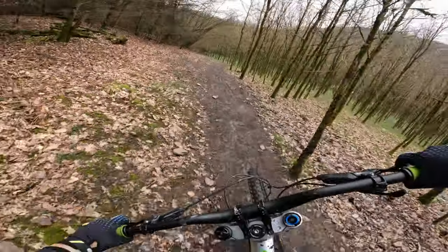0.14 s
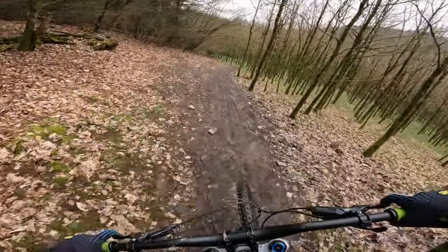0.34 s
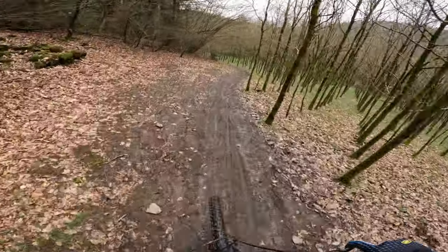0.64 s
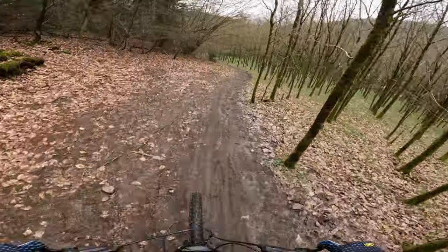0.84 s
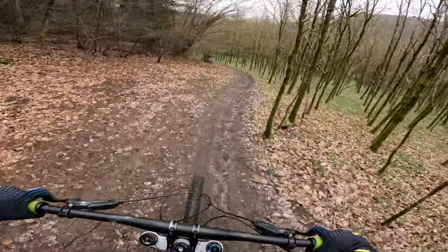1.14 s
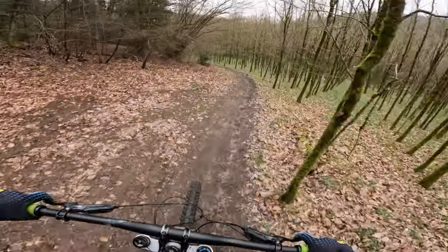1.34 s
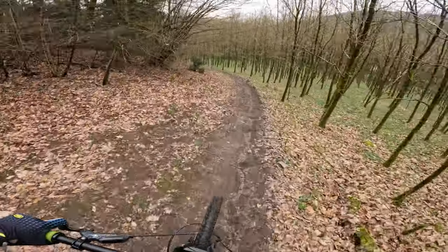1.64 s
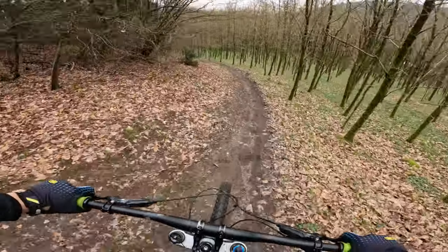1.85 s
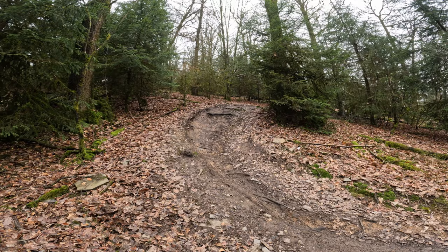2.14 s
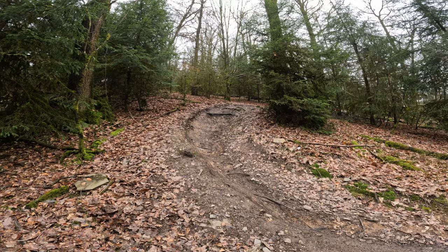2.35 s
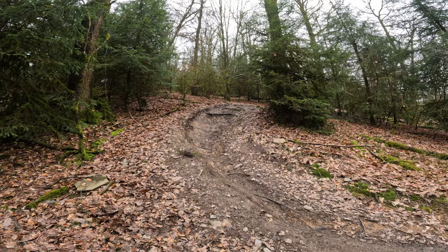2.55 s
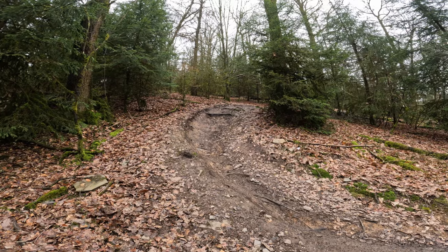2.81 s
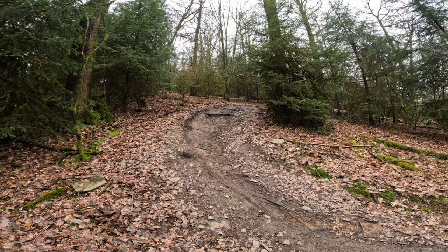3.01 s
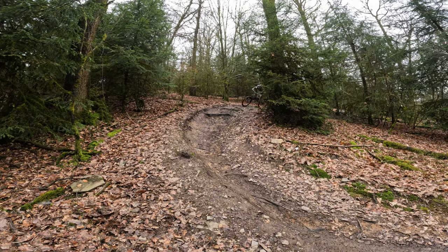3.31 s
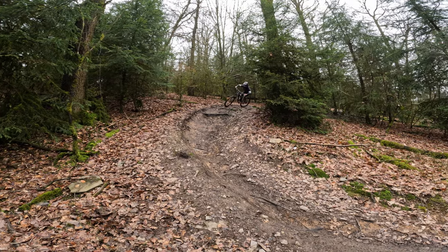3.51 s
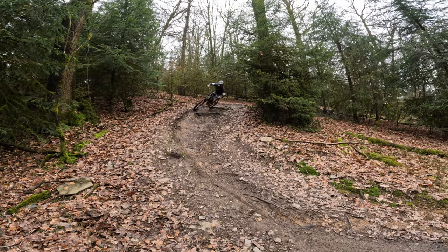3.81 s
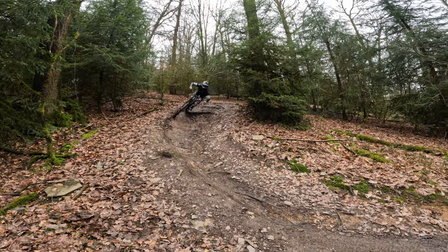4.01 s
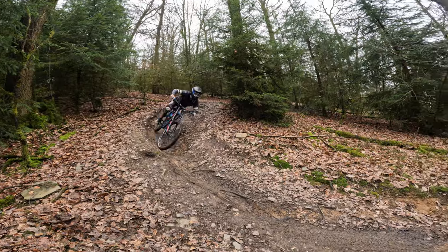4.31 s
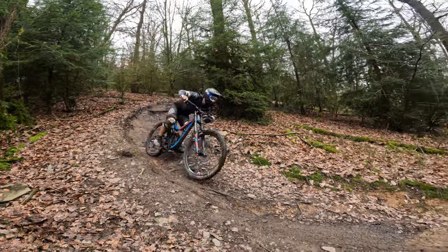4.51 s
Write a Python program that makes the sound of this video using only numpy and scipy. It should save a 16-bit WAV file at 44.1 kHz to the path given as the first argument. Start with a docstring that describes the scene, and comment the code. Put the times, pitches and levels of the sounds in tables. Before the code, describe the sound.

A mountain bike on damp leaves and mud: first a close on-board microphone, the same in both channels, with bassy wind, rattling jolts, grit ticks and muted tyre hiss. Then an abrupt switch to a still trailside microphone with wide, quiet air. The bike nears through a bend, its sparse clicks becoming dense crunching, spray, clatter and thuds close by.

```python
"""A bike runs down a wet forest trail, heard first from on board: shaped noise makes the wind, frame rumble
and tyre fizz; short noise bursts and ringing modes make the squelches, jolts and ticks of grit.
The sound then cuts to a still spot beside the trail: quiet woods of steady noise, and the bike coming near
with grainy tyre crunch and spray, resonant clacks, cracking stones and twigs, and thuds in the ground."""
import sys
import numpy as np
from scipy import signal
from scipy.fft import rfft, irfft, next_fast_len
from scipy.io import wavfile
from scipy.ndimage import uniform_filter1d

SR = 44100
rng = np.random.default_rng(int(sys.argv[2]) if len(sys.argv) > 2 else 0)


def log_audio(samples):
    """Write samples as a 16-bit WAV file to the path given in sys.argv[1]."""
    # one column per channel
    frames = np.atleast_2d(samples).T
    # limit to full scale, then quantise
    limited = np.clip(frames, -1, 1)
    pcm = np.round(limited * 32767).astype(np.int16)
    wavfile.write(sys.argv[1], SR, pcm)


N = 205550  # samples

CUT_S = 2.181  # from on board to beside the trail

# Spectrum tables give the shape of a noise: pitch_hz, relative_db
# Wind and frame on board: start_s, wind_db, frame_rumble_db
WIND_AND_RUMBLE_LEVELS = [(0.0, -21.5, -25), (0.15, -25, -31), (0.2, -18.5, -26.5), (0.245, -21, -28),
                          (0.28, -24, -29.5), (0.32, -25, -31), (0.75, -28, -31.5), (0.8, -20, -27.5),
                          (0.83, -27.5, -32.5), (1.4, -29.5, -35.5), (2.01, -24, -33), (2.17, -27, -30)]
# Wind on the microphone: pitch_hz, relative_db
WIND_SPECTRUM = [(4.7, -27), (8.0, 9), (28, 6), (108, -11.5), (200, -5.5), (260, -100), (440, -120)]
# Low shaking of the frame: pitch_hz, relative_db
RUMBLE_SPECTRUM = [(41, -13), (70, 1), (107, -14), (210, -5.5), (258, -3.5), (587, -13.5), (775, -22.5),
                   (900, -17.5), (1170, -22), (1980, -120)]
# Wet tyres on board: start_s, fizz_db, fine_spray_db
TYRE_LEVELS = [(0.0, -34, -53), (0.01, -35, -32.5), (0.08, -39, -30.5), (0.13, -39.5, -32),
               (0.18, -38, -43), (0.21, -40, -35), (0.29, -34.5, -40), (0.33, -45.5, -48), (0.4, -38, -33),
               (0.47, -43, -49.5), (0.75, -38, -41.5), (0.87, -37.5, -44.5), (0.9, -42.5, -49),
               (0.958, -48.5, -49.5), (0.975, -38, -40), (1.02, -44, -41), (1.13, -40, -46.5),
               (1.16, -36.5, -41.5), (1.49, -46.5, -46.5), (1.63, -40.5, -40.5), (1.73, -46.5, -47),
               (1.9, -41, -46), (1.91, -38, -43), (1.95, -41, -45), (2.06, -27.5, -37), (2.07, -39, -49),
               (2.1, -31.5, -42.5), (2.17, -38, -45)]
# Tyre roll on board: start_s, level_db
ROLL_LEVELS = [(0.0, -49), (0.1, -38.5), (0.3, -56), (0.45, -43), (0.68, -39), (1.26, -41), (1.37, -48.5),
               (1.58, -44.5), (1.89, -42.5), (1.99, -53), (2.02, -38), (2.14, -37), (2.17, -38.5)]
# Low tone of the rolling tyre: pitch_hz, relative_db
ROLL_SPECTRUM = [(240, 31.5), (400, 15), (759, 19), (1420, 17.5), (1580, -13), (1710, 5.5), (3000, -46),
                 (3900, -39), (6600, -120)]
# Wet fizz of the tread: pitch_hz, relative_db
FIZZ_SPECTRUM = [(820, -27), (1400, 1.5), (1880, -3.5), (2140, 0.5), (2420, -4.5), (3040, -3), (5380, -18),
                 (7000, -30), (9100, -27), (15400, -120)]
# Fine spray on board: pitch_hz, relative_db
MIST_SPECTRUM = [(2350, -4.5), (4000, -3.5), (6640, -10), (10100, -23), (12300, -31.5), (14200, -42),
                 (15600, -54)]
# Puffs of spray as the tyre cuts through wet patches: start_s, spray_rise_db (a negative one dips)
SPRAY_PUFFS = [(0.435, 6), (0.52, 8), (0.594, 9), (0.68, 6), (0.755, 2), (0.826, 2.5), (1.035, 1),
               (1.24, 2), (1.35, 4), (1.65, -0.5)]
# Squelches of mud: start_s, level_db, pitch_hz, length_s
SQUELCHES = [(0.006, -25.5, 2950, 0.016), (0.027, -27.5, 2700, 0.018), (0.047, -30, 3000, .02),
             (0.092, -29.5, 1720, .03), (0.068, -34, 4230, 0.027), (0.116, -35, 1720, 0.045),
             (0.214, -33, 2600, 0.018), (0.271, -36, 2760, .02), (0.968, -44, 4500, .012),
             (0.98, -36.5, 4430, .025), (1.032, -33, 5100, 0.013), (0.869, -34.5, 1390, .035),
             (1.15, -35.5, 1500, 0.052), (1.356, -39, 4500, 0.0078), (1.407, -41.5, 4000, .015)]
# Rattling modes of the frame: pitch_hz, width_hz, level_db
FRAME_MODES = [(695, 63, 2), (840, 27, 3), (915, 50, 4.5), (1050, 230, 4), (1280, 47, 5), (1984, 110, -3.5),
               (2190, 100, -2.5), (2445, 170, -3.5), (2700, 170, -3.5), (2880, 120, -11),
               (3240, 400, -13.5)]
# Jolts through the frame: start_s, rattle_peak_db, tone_hz, tone_against_rattle_db,
# brightness_db_per_octave, hold_s, t60_s, first_blow_against_shaking_db
JOLTS = [(0.085, -20.5, 218, -14, 14, 0.016, 0.26, 18), (0.18, -24.5, 200, 1, 0, 0.0044, 0.032, 14),
         (0.22, -17.5, 300, 4.5, -3, 0.0047, 0.023, 23), (0.253, -18, 450, -4, -4, .002, 0.03, 32),
         (0.355, -24.5, 300, 1, -2, .002, 0.076, 19.5), (0.473, -24, 224, 5.5, 19, .002, 0.032, 5),
         (0.661, -40, 220, -11, -7, 0.0036, 0.028, 24), (0.724, -36, 220, -15, 12, .001, .02, 26),
         (0.736, -7, 192, 3, 3, 0.0032, 0.012, 24), (0.748, -20, 202, 7, 3, .002, 0.027, 16),
         (0.761, -16.5, 266, -5, -3.5, 0.012, 0.067, 12), (0.786, -20, 218, -14, 1, 0.0076, 0.07, 18.5),
         (0.815, -27, 222, -2, -5, .008, 0.05, 20), (0.853, -21, 175, 6.5, -4, 0.0057, 0.041, 24),
         (1.783, -22, 210, 4, -4, 0.0042, 0.02, 12), (1.847, -14.5, 208, 1.5, 4, 0.003, 0.012, 16.5),
         (1.904, -12.5, 910, -5, 5.5, 0.0029, 0.022, 19.5), (2.023, -15, 218, -19, 2, 0.0067, 0.036, 12),
         (2.031, -8.5, 846, -2.5, -4.5, 0.0034, 0.048, 19.5), (2.036, -11.5, 219, 2, 2, 0.017, 0.03, 8),
         (2.054, -10, 220, -12, 7, 0.0026, 0.012, 24), (2.094, -19.5, 220, -25, 1.5, 0.0088, 0.081, 8),
         (2.106, -15.5, 840, -4.5, -1.5, 0.0038, 0.083, 19.5), (2.124, -18, 220, -18, -7, 0.0049, 0.05, 25),
         (2.158, -18, 219, -14, 3, .004, 0.12, 24)]
# Grit flicked against the frame: start_s, peak_db, pitch_hz
GRIT_TICKS = [(0.1909, -29, 3070), (0.367, -26, 4300), (0.378, -22, 3360), (0.515, -24, 3050),
              (0.6808, -27, 3350), (0.8214, -24, 3400), (1.0695, -26, 3200), (1.3542, -38, 3650),
              (1.411, -36, 3260), (2.001, -24, 3300)]

# Still air among the trees: pitch_hz, relative_db
WOODS_SPECTRUM = [(180, -28), (300, -1.5), (520, -23), (800, -31), (1000, -13), (4080, -35), (4440, -39),
                  (4660, -8), (7650, -21), (15600, -50)]
# Tyres beside the trail: start_s, crunch_db, spray_db, ground_rumble_db
PASS_LEVELS = [(2.19, -53, -83, -49), (2.37, -52, -64, -41), (2.472, -55.5, -57, -43.5),
               (2.482, -49.5, -70, -34.5), (2.515, -45, -47, -40), (2.53, -47.5, -47, -38.5),
               (2.6, -48, -47.5, -39.5), (2.664, -45, -44.5, -28.5), (2.74, -50.5, -47, -42),
               (2.804, -52.5, -51.5, -41.5), (2.9, -56.5, -57.5, -45.5), (3.006, -58, -53, -44.5),
               (3.12, -60, -58.5, -48), (3.2, -55.5, -61, -47), (3.35, -55, -60, -40.5),
               (3.472, -49.5, -55, -42), (3.77, -46, -54.5, -41.5), (3.87, -51, -52.5, -35),
               (3.974, -45, -48.5, -37), (4.02, -49, -57, -33.5), (4.08, -40.5, -48, -30),
               (4.17, -35.5, -42, -41), (4.205, -44.5, -48.5, -36), (4.24, -33.5, -38.5, -25),
               (4.305, -45.5, -51, -35), (4.35, -39, -41.5, -36), (4.43, -33, -47, -33),
               (4.47, -35, -41, -33), (4.6, -34, -35.5, -36), (4.625, -36.5, -44, -40),
               (4.66, -30, -39.5, -35)]
# Rumble through the ground: pitch_hz, relative_db
GROUND_SPECTRUM = [(7.1, -28), (12, -20), (43, 6), (65, 1.5), (118, -7), (211, -13.5), (266, -23.5),
                   (300, -22), (390, -85), (660, -120)]
# Lower body of the tyre noise: pitch_hz, relative_db
BODY_SPECTRUM = [(76, -35), (130, 2.5), (300, -7), (460, -7.5), (859, -12.5), (1200, -52), (1560, -32),
                 (2640, -120)]
# Tyre crunch: pitch_hz, relative_db
CRUNCH_SPECTRUM = [(410, -74), (700, 5.5), (809, -43), (899, 11), (1270, 10.5), (1830, 8.5), (4950, -0.5),
                   (7000, -33), (9100, -23), (15400, -120)]
# Spray beside the trail: pitch_hz, relative_db
SPRAY_SPECTRUM = [(2060, -8), (3500, -1.5), (4940, -4), (5660, -8.5), (7360, -7), (8450, -16),
                  (9870, -14.5), (15600, -37)]
# Clacks of chain and stones: start_s, level_db, centre_hz, treble_against_clack_db, thud_db, t60_s
CLACKS = [(2.265, -35, 1280, -27, -55, 0.023), (2.29, -31, 1480, -24, -52, 0.037),
          (2.343, -64, 3430, -15, -30.5, 0.022), (2.478, -30.5, 1610, -23, -48, .04),
          (3.02, -36, 2130, -30, -57, .03), (3.345, -54, 1770, -21, -48, 0.033),
          (3.366, -35, 1880, -21, -55, 0.028), (3.405, -31.5, 1180, -12, -54, 0.032),
          (3.458, -29, 2120, -21, -45, 0.094), (3.474, -32, 2880, -31, -40, 0.12),
          (3.553, -32, 1800, -15, -52, 0.075), (3.587, -24.5, 1410, -8, -38, 0.097),
          (3.599, -22, 1370, -25, -59, 0.054), (3.6345, -22.5, 1220, -20, -73, 0.032),
          (3.679, -27, 2780, -29, -38, 0.035), (3.688, -26, 1090, -28, -42, 0.021),
          (3.707, -29.5, 2500, -24, -47, 0.029), (3.742, -26, 1600, -35, -36, 0.0084),
          (3.749, -27, 1440, -10, -34, 0.019), (3.7875, -25, 2720, -11, -31, 0.013),
          (3.797, -24.5, 2720, -20, -35, 0.041), (3.813, -30, 1010, -9, -32.5, 0.064),
          (3.851, -38, 2850, -14, -38, 0.02), (3.883, -12.5, 2470, -37, -31, 0.031),
          (3.8855, -26, 2800, -23, -50, 0.033), (3.892, -14.5, 1790, -19, -17.5, 0.057),
          (3.915, -18, 1100, -18, -27, 0.061), (3.934, -22, 2100, -17, -52, 0.093),
          (3.942, -33, 2200, -18, -48, 0.023), (3.947, -29, 4500, -18, -40, 0.022),
          (3.951, -22, 2020, -24, -52, 0.0057), (3.957, -11.5, 1970, -20, -68, 0.029),
          (3.966, -22.5, 1940, -12, -22, 0.088), (3.973, -27, 2800, -20, -27, .02),
          (4.025, -25, 4300, -26, -38, 0.059), (4.033, -21, 2000, -28, -25, 0.01),
          (4.039, -24, 4500, -15, -39, 0.011), (4.062, -13, 3000, -38, -19, 0.057),
          (4.07, -33, 2950, 9, -56, 0.093), (4.1, -20, 1070, -5, -36, 0.15),
          (4.135, -21, 2510, -20, -37, 0.044), (4.17, -24.5, 1850, 0, -41, 0.037),
          (4.216, -18, 1760, -11, -18.5, 0.038), (4.241, -16, 1630, -3.5, -29, 0.072),
          (4.3125, -26, 3000, -18, -44, .015), (4.315, -13, 1430, -22, -28, 0.057),
          (4.336, -10.5, 1750, -16, -15, 0.048), (4.374, -22, 3000, -16, -37, 0.046),
          (4.381, -32, 2500, -7, -42, .03), (4.4, -27, 2400, -20, -50, 0.043),
          (4.413, -30, 2200, -20, -41, .03), (4.442, -20, 2600, -18, -31, 0.025),
          (4.455, -16.5, 2000, -16, -34, 0.05), (4.463, -22, 5000, -4, -35, 0.023),
          (4.474, -13.5, 1600, -14, -30, 0.034), (4.491, -23.5, 3000, 2.5, -47, 0.026),
          (4.514, -26, 2490, -10, -24, 0.032), (4.526, -14.5, 3300, -23, -25, 0.065),
          (4.534, -20, 3100, -16, -36, 0.026), (4.548, -31, 2500, -13, -28, 0.034),
          (4.559, -17, 1700, -17, -25, 0.028), (4.566, -17, 3300, -12, -33, 0.024),
          (4.575, -15, 2160, -10, -15.5, 0.046), (4.587, -19, 1760, -17, -21, 0.0099),
          (4.595, -18, 1810, -13, -52, 0.016), (4.599, -19, 2600, -12, -28, 0.012),
          (4.604, -16, 1280, -30, -35, 0.01), (4.632, -22, 1500, -25, -40, 0.051),
          (4.64, -11, 3470, -3.5, -12, 0.038), (4.6445, -3.5, 1580, -15, -17.5, 0.018)]
# Thud modes of the soil: pitch_hz, width_hz, level_db
THUD_MODES = [(70.5, 64, 6), (143.5, 54, -4), (300, 120, -4)]
# Stones and twigs cracking under the tyre: start_s, peak_db, pitch_hz
CRACKS = [(3.3457, -38, 2620), (3.3686, -35, 2390), (3.3982, -34, 1760), (3.4594, -28, 2270),
          (3.4676, -30, 2280), (3.4742, -31, 2330), (3.5078, -34, 2370), (3.5126, -33, 2170),
          (3.525, -32, 2500), (3.5403, -36, 2940), (3.5539, -30, 2300), (3.5864, -28, 3030),
          (3.5933, -26, 2450), (3.6348, -27, 1400), (3.6635, -33, 2320), (3.6802, -27, 2320),
          (3.6901, -24, 2600), (3.7045, -31, 2100), (3.7113, -33, 3080), (3.7288, -34, 2630),
          (3.7418, -21, 3240), (3.7511, -25, 3210), (3.7781, -32, 2850), (3.7871, -22, 3080),
          (3.7938, -28, 2740), (3.8133, -29, 2680), (3.8502, -30, 3090), (3.8825, -14, 2700),
          (3.8852, -15, 2690), (3.8922, -18, 2250), (3.9158, -21, 1440), (3.9355, -26, 2430),
          (3.9467, -25, 3180), (3.9511, -14, 2170), (3.9573, -12, 2420), (3.9641, -19, 2550),
          (4.0243, -22, 2860), (4.0333, -12, 2580), (4.0358, -20, 2740), (4.0389, -19, 2920),
          (4.0625, -10, 3170), (4.0729, -16, 2770), (4.1038, -25, 2720), (4.1354, -19, 2850),
          (4.157, -24, 2970), (4.1708, -21, 3500), (4.2173, -18, 2590), (4.243, -20, 1800),
          (4.2458, -18, 2810), (4.3154, -15, 1690), (4.3364, -13, 2930), (4.3419, -15, 1720),
          (4.3735, -14, 3030), (4.3786, -20, 2570), (4.3826, -18, 2520), (4.3998, -16, 2580),
          (4.4094, -20, 2270), (4.4131, -20, 2010), (4.4223, -20, 2280), (4.4321, -24, 2560),
          (4.4419, -14, 2750), (4.4448, -17, 1810), (4.4557, -15, 2030), (4.4731, -16, 1860),
          (4.4898, -21, 2470), (4.493, -19, 3710), (4.4964, -21, 3100), (4.515, -13, 2350),
          (4.5303, -15, 3430), (4.5328, -11, 2830), (4.5378, -17, 3110), (4.5599, -13, 2270),
          (4.5657, -13, 2440), (4.5723, -16, 2710), (4.5772, -13, 3030), (4.5864, -10, 2230),
          (4.5957, -13, 2000), (4.5993, -10, 2530), (4.6041, -12, 2690), (4.6151, -23, 2640),
          (4.6399, -7, 2360), (4.6453, -7, 1620)]
# Stereo width of the noises beside the trail, before narrowing: pitch_hz, side_against_middle_db
STEREO_WIDTH = [(60, -15), (110, -28), (200, -16), (380, -11), (700, -8), (1290, -5), (2380, -3),
                (4400, -4), (15000, -32)]
# Fluttering treble spread between the ports: pitch_hz, side_against_middle_db
TREBLE_SPREAD = [(1000, -50), (3000, -37), (9000, -9), (12500, -3), (15000, -6)]
# Tonal balance between the ports: pitch_hz, left_against_right_db
PORT_BALANCE = [(600, 0), (3000, -1.4), (8000, -0.2), (14000, 7.5)]

USUAL_FIZZ_DB, RUMBLE_FOLLOWS = -40, 0.47  # rumble swells with the fizz, dB per dB
PUFF_RISE_S, PUFF_FIZZ = 0.012, 0.45  # time to the top; share of the rise that the fizz takes
SQUELCH_WIDTH = 0.32  # share of the pitch
JOLT_RISE_S = 0.0032
TICK_WIDTH, TICK_T60_S = 0.13, 0.014  # width as a share of the pitch

WOODS_DB = -61.5
CRUNCH_FAR_DB, CRUNCH_NEAR_DB = -58, -32  # crunch levels that stand for far off and close by
BODY_FAR_DB, BODY_NEAR_DB = -66, -29.5
ARRIVES_S, PASSES_S = 3.17, 4.4  # the run-in through the bend
GRAINS_FAR, GRAINS_NEAR = 0.25, 0.63  # share of separate grains, 0-1
PAN_FAR_DB, PAN_NEAR_DB = -1, 2.5  # left against right
WIDTH_FAR_DB, WIDTH_NEAR_DB = -0.5, -8.5  # trim on the side signal

RATTLE_HISS, RATTLE_TICKS = 0.3, 4.5  # a clack's tail is more ticks than hiss
CLACK_SCATTER_DB = 2  # random left-right lean
KNOCK_DB, KNOCK_FOLLOWS, USUAL_THUD_DB = -6.5, 0.66, -19  # low knock grows as thud grows against clack
SMALL_OVER_DB, SMALL_SPREAD_DB = 5, 4  # lesser clacks: level over the crunch, and its random range
SMALL_HZ, SMALL_TREBLE_DB, SMALL_THUD_DB, SMALL_T60_S = 2200, -17, -20, 0.049

CRACK_WIDTH, BOUNCE_S, BOUNCE_DB = 0.87, 0.00045, -10.5  # share of the pitch; echo off the ground
LESSER_OVER_DB, LESSER_HZ = 4, 2600  # lesser cracks: least level over the crunch, middle pitch

LEFT_LAG_S, LAG_FADES_HZ = 3e-5, 4000  # above this pitch the lag dies away
CEILING, EDGE_HZ = 0.62, 15730  # soft limit on amplitude; top of the band


def gain_of(db):
    """Turns decibels into gain."""
    return 10 ** (np.asarray(db) / 20)


def evened(x):
    """Scales to rms 1."""
    return x / np.sqrt(np.mean(x ** 2) + 1e-20)


def spectrum_db(points, hz):
    """Reads a spectrum table on a log-frequency axis."""
    f, value = np.transpose(points)
    return np.interp(np.log(hz + 1), np.log(f + 1), value)


def curve(rows, column):
    """Draws one column of a table as a line over every sample."""
    rows = np.vstack(rows)
    return np.interp(np.arange(N) / SR, rows[:, 0], rows[:, column])


def coloured(x, points):
    """Filters x by the table, silent outside it, and scales to rms 1."""
    size = next_fast_len(N)
    hz = np.fft.rfftfreq(size, 1 / SR)
    inside = (hz >= points[0][0]) & (hz <= points[-1][0])
    shaped = rfft(x, size) * gain_of(spectrum_db(points, hz)) * inside
    return evened(irfft(shaped, size)[..., :N])


def white():
    """Plain noise of rms 1."""
    return rng.standard_normal(N)


def lumps(per_s):
    """Low-passed noise of rms 1, wandering at rates up to about per_s Hz."""
    return evened(signal.lfilter(*signal.butter(2, per_s, fs=SR), white()))


def grit(per_s, spread_db, grains):
    """Random decaying snaps of uneven size, blended with smooth noise by the share of grains."""
    sizes = gain_of(spread_db * np.minimum(rng.exponential(1, N), 3))
    hits = sizes * (rng.random(N) < per_s / SR)
    decay = np.exp(-1 / (0.0014 * SR))  # each snap fades over about a millisecond
    snaps = signal.lfilter([1], [1, -decay], hits) * white()
    grains = np.clip(grains, 0, 1)
    return np.sqrt(grains) * evened(snaps) + np.sqrt(1 - grains) * white()


def ring(x, modes):
    """Sums damped resonances driven by x; a wider mode dies sooner."""
    out = 0
    for hz, width, db in modes:
        pole = np.exp((2j * hz - width) * np.pi / SR)
        out = out + gain_of(db) * signal.lfilter([1 - abs(pole)], [1, -pole], x).imag
    return out


def dulled(x, hz):
    """Low-passes away the treble that soft rubber and mud do not pass on."""
    return signal.lfilter(*signal.butter(3, hz, fs=SR), x)


def thinned(x, hz):
    """High-passes away the bass that a small part cannot radiate."""
    return signal.lfilter(*signal.butter(2, hz, "high", fs=SR), x)


def patchy(x, depth_db, frames, bins):
    """Lets patches of the spectrum swell and fade, as the ground under the tyre keeps changing."""
    z = signal.stft(x, nperseg=256, noverlap=192)[2]
    field = uniform_filter1d(rng.standard_normal(z.shape[-2:]), bins, 0)
    field = uniform_filter1d(field, frames, 1)
    z = z * gain_of(depth_db * evened(field))
    return evened(signal.istft(z, nperseg=256, noverlap=192)[1][..., :N])


def add(mix, start_s, sound):
    """Mixes a sound in at its start time."""
    part = mix[..., round(start_s * SR):][..., :sound.shape[-1]]
    part += sound[..., :part.shape[-1]]


def between(far, near, share):
    """Blends two values."""
    return far + (near - far) * np.clip(share, 0, 1)


def wind():
    """Air buffets the microphone: low noise whose level follows the ride."""
    return coloured(white(), WIND_SPECTRUM) * gain_of(curve(WIND_AND_RUMBLE_LEVELS, 1))


def frame_rumble(bumps):
    """The frame passes on the bumps as low, half-grainy noise that swells with the fizz."""
    swell_db = curve(TYRE_LEVELS, 1) - USUAL_FIZZ_DB
    level_db = curve(WIND_AND_RUMBLE_LEVELS, 2) + RUMBLE_FOLLOWS * swell_db + 1.43 * bumps
    return coloured(grit(300, 6, 0.4), RUMBLE_SPECTRUM) * gain_of(level_db)


def puffs_db():
    """Wet patches swell the spray: each puff rises fast and sinks more slowly."""
    out, u = np.zeros(N), np.arange(6000) / SR / PUFF_RISE_S
    for start_s, rise_db in SPRAY_PUFFS:
        add(out, start_s, rise_db * u * np.exp(1 - u))
    return out


def tyres_on_mud(bumps):
    """Droplets off the tread make both roll and fizz; a denser, finer grit makes the mist of spray."""
    puffs = puffs_db()
    droplets = patchy(grit(2500, 6, 0.66), depth_db=1.5, frames=11, bins=3)
    roll = coloured(droplets, ROLL_SPECTRUM) * gain_of(curve(ROLL_LEVELS, 1) + 1.4 * bumps)
    fizz_db = curve(TYRE_LEVELS, 1) + PUFF_FIZZ * puffs + 0.16 * bumps
    fizz = coloured(droplets, FIZZ_SPECTRUM) * gain_of(fizz_db)
    fine = patchy(grit(4900, 6, 0.48), depth_db=3, frames=6, bins=4)
    mist = coloured(fine, MIST_SPECTRUM) * gain_of(curve(TYRE_LEVELS, 2) + puffs + 0.092 * bumps)
    return roll + fizz + mist


def riding():
    """Wind plus a frame and tyres that shake with the same bumps."""
    bumps = lumps(per_s=18)
    return wind() + frame_rumble(bumps) + tyres_on_mud(bumps)


def squelches():
    """Mud squeezes out from the tread in short swells of bright, pitched fizz."""
    out, t = np.zeros(N), np.arange(3000) / SR
    for (start_s, level_db, hz, length_s), noise in zip(SQUELCHES, rng.standard_normal((len(SQUELCHES), 3000))):
        swell = np.sin(np.pi * np.clip(t / length_s, 0, 1) ** 0.35)  # quick rise, slow fall
        band = [(hz, SQUELCH_WIDTH * hz, 0)]
        fizz = evened(ring(ring(noise, band), band))
        add(out, start_s, gain_of(level_db) * swell * fizz)
    return out


def jolts():
    """A first blow and a burst of shaking rattle the frame's modes, and one clear tone swings along."""
    out, t = np.zeros(N), np.arange(6000) / SR
    for row, noise in zip(JOLTS, rng.standard_normal((len(JOLTS), len(t)))):
        start_s, peak_db, tone_hz, tone_db, bright_db, hold_s, t60_s, blow_db = row
        force = (1 - np.exp(-t / JOLT_RISE_S)) * gain_of(-60 * np.maximum(t - hold_s, 0) / t60_s)
        shaking = noise * force * (1 + 2.16 * (abs(noise) > 2.2))  # loose parts knock
        blows = shaking + gain_of(blow_db) * (t == 0)
        modes = [(hz, width, db + bright_db * np.log2(hz / 900)) for hz, width, db in FRAME_MODES]
        rattle = dulled(ring(blows, modes), hz=4500)
        tone = force * np.sin(2 * np.pi * tone_hz * t)  # one clear tone of the frame swings cleanly
        add(out, start_s, gain_of(peak_db) * (rattle / abs(rattle).max() + gain_of(tone_db) * tone))
    return out


def grit_ticks():
    """Each bit of grit hits the frame with a click and a fading hiss that ring one bright mode."""
    out, t = np.zeros(N), np.arange(1500) / SR
    for (start_s, peak_db, hz), noise in zip(GRIT_TICKS, rng.standard_normal((len(GRIT_TICKS), len(t)))):
        hit = noise * gain_of(-60 * t / TICK_T60_S) + 2 * (t == 0)
        tick = ring(hit, [(hz, TICK_WIDTH * hz, 0)])
        tick = thinned(tick / abs(tick).max(), hz=2000)
        add(out, start_s, gain_of(peak_db) * dulled(tick, hz=8000))
    return out


def nearness():
    """Reads 0 for tyres far off and 1 for close by from the loudness of the crunch."""
    return (curve(PASS_LEVELS, 1) - CRUNCH_FAR_DB) / (CRUNCH_NEAR_DB - CRUNCH_FAR_DB)


def run_in():
    """Climbs from 0 as the bike enters the bend to 1 as it passes."""
    return (np.arange(N) / SR - ARRIVES_S) / (PASSES_S - ARRIVES_S)


def widened(make, points):
    """Builds two channels from separate middle and side noises; they narrow as the bike comes near."""
    size = next_fast_len(N)
    width = gain_of(spectrum_db(STEREO_WIDTH, np.fft.rfftfreq(size, 1 / SR)))
    side = irfft(rfft(make(), size) * width, size)[:N]
    side *= gain_of(between(WIDTH_FAR_DB, WIDTH_NEAR_DB, run_in()))
    mid = make()
    return coloured(np.array([mid + side, mid - side]), points)


def woods_air():
    """Still air among the trees: quiet, steady noise."""
    return gain_of(WOODS_DB) * widened(white, WOODS_SPECTRUM)


def ground_rumble():
    """The soil carries the tyres' weight as deep noise with an uneven level."""
    level_db = curve(PASS_LEVELS, 3) + 1.6 * lumps(per_s=47)
    return widened(white, GROUND_SPECTRUM) * gain_of(level_db)


def passing_tyres():
    """Body, crunch and spray lump together and part into grains near by; crunch and spray also pan."""
    bumps = lumps(per_s=21)
    grains = between(GRAINS_FAR, GRAINS_NEAR, 2 * run_in())  # full by half of the run-in
    body_db = between(BODY_FAR_DB, BODY_NEAR_DB, nearness()) + 0.38 * grains * bumps
    body = widened(lambda: grit(300, 1.3, grains), BODY_SPECTRUM) * gain_of(body_db)
    crunch = widened(lambda: grit(500, 6, grains), CRUNCH_SPECTRUM)
    crunch = patchy(crunch, depth_db=1, frames=2, bins=52)
    crunch *= gain_of(curve(PASS_LEVELS, 1) + 2.3 * grains * bumps)
    spray = widened(lambda: grit(2000, 6, grains), SPRAY_SPECTRUM)
    spray *= gain_of(curve(PASS_LEVELS, 2) + 4.2 * grains * bumps)
    pan_db = between(PAN_FAR_DB, PAN_NEAR_DB, run_in()) * [[0.5], [-0.5]]
    return body + (crunch + spray) * gain_of(pan_db)


def small_clacks(count):
    """Lesser clacks at chance moments, crowding towards the end, with levels tied to the crunch."""
    when, size, pitch = rng.random((count, 3)).T
    at = (CUT_S * SR + when ** 0.45 * (N - 1 - CUT_S * SR)).astype(int)
    levels_db = curve(PASS_LEVELS, 1)[at] + SMALL_OVER_DB + SMALL_SPREAD_DB * (2 * size - 1)
    pitches_hz = SMALL_HZ * 2 ** (2.3 * (pitch - 0.5))
    return [(a / SR, db, hz, SMALL_TREBLE_DB, db + SMALL_THUD_DB, SMALL_T60_S)
            for a, db, hz in zip(at, levels_db, pitches_hz)]


def soil_thud(t):
    """A smooth push of 6.2 ms rings the soil's low modes."""
    push = np.sin(np.pi * np.minimum(t / 0.0062, 1)) ** 2
    thud = thinned(ring(push, THUD_MODES), hz=44.7)
    return thud / abs(thud).max()


def clacks():
    """A hard tick with a scatter of smaller ticks behind it rings a part of the bike; the soil thuds."""
    out, t = np.zeros((2, N)), np.arange(3000) / SR
    thud = soil_thud(t)
    rows = list(CLACKS) + small_clacks(count=16)
    for row, (hiss, chance, side) in zip(rows, rng.standard_normal((len(rows), 3, len(t)))):
        start_s, level_db, hz, treble_db, thud_db, t60_s = row
        scatter = (RATTLE_HISS + RATTLE_TICKS * (chance > 2.5)) * gain_of(-60 * t / t60_s)
        hits = (hiss + 0.15 * side * [[1], [-1]]) * scatter  # spread a little to both sides
        hits[:, 0] += 2.7 * np.sign(chance[-1])  # the first contact is one clean blow
        modes = [(hz, 0.16 * hz, 0), (1.19 * hz, 0.82 * hz, -6),
                 (0.374 * hz, 0.096 * hz, -8), (3300, 1200, -8)]
        part = thinned(dulled(ring(hits, modes), hz=5630), 0.17 * hz)
        treble = ring(ring(hits, [(5570, 17000, 0)]), [(5400, 13000, 0)])
        treble = thinned(dulled(treble, hz=7800), hz=3000)
        knock = ring(ring(hits, [(536, 1100, 0)]), [(535, 1100, 0)])
        # even out the energy of each piece before setting levels
        part_size, treble_size, knock_size = [np.linalg.norm(v) / 6 for v in (part, treble, knock)]
        clack = part / part_size + gain_of(treble_db) * treble / treble_size
        lean_db = CLACK_SCATTER_DB * side[-1] * np.array([[0.5], [-0.5]])
        add(out, start_s, gain_of(level_db + lean_db) * clack)
        knock_db = level_db + KNOCK_DB + KNOCK_FOLLOWS * (thud_db - level_db - USUAL_THUD_DB)
        low = gain_of(knock_db) * knock.mean(0) / knock_size
        add(out, start_s, low - gain_of(thud_db) * thud)
    return out


def cracks(count=90):
    """Each crack is a heavily damped snap with a close echo; lesser ones come by chance in the run-in."""
    out, t = np.zeros((2, N)), np.arange(200) / SR
    when, size, pitch = rng.random((count, 3)).T
    starts_s = ARRIVES_S + when ** 0.5 * (N / SR - ARRIVES_S)
    levels_db = curve(PASS_LEVELS, 1)[(starts_s * SR).astype(int)] + LESSER_OVER_DB + 6.6 * size
    lesser = zip(starts_s, levels_db, LESSER_HZ * 2 ** (1.5 * (pitch - 0.5)))
    rows = list(CRACKS) + list(lesser)
    for (start_s, peak_db, hz), (lean, late) in zip(rows, rng.standard_normal((len(rows), 2))):
        blow = -1.0 * (t == 0)
        blow[round(BOUNCE_S * SR * 2 ** (0.3 * late))] -= gain_of(BOUNCE_DB)
        snap = ring(blow, [(hz, CRACK_WIDTH * hz, 0), (1.43 * hz, hz, -9)])
        snap = dulled(thinned(snap, 0.15 * hz), hz=6500)
        lean_db = 1.7 * lean * np.array([[0.5], [-0.5]])
        add(out, start_s, gain_of(peak_db + lean_db) * snap / abs(snap).max())
    return out


def spread(x, points):
    """Adds a fluttering copy of the middle with opposite signs left and right."""
    copy = thinned(x.mean(0), hz=1500) * lumps(per_s=150)
    gain = gain_of(spectrum_db(points, np.fft.rfftfreq(N, 1 / SR)))
    return x + irfft(rfft(copy) * gain, N) * [[1], [-1]]


def through_ports(x):
    """Tilts the tone between the two ports and delays the left, less and less towards the treble."""
    hz = np.fft.rfftfreq(N, 1 / SR)
    balance = gain_of(spectrum_db(PORT_BALANCE, hz) * [[0.5], [-0.5]])
    lag_s = LEFT_LAG_S / (1 + (hz / LAG_FADES_HZ) ** 2) * [[1], [0]]
    return irfft(rfft(x) * balance * np.exp(-2j * np.pi * hz * lag_s), N)


def scene():
    """On board, the same in both channels, until the cut; then in stereo beside the trail."""
    aboard = np.clip((CUT_S - np.arange(N) / SR) / 0.00092, 0, 1)  # crossfade of 0.92 ms
    on_board = riding() + squelches() + jolts() + grit_ticks()
    trail = woods_air() + ground_rumble() + passing_tyres() + clacks() + cracks()
    beside = spread(through_ports(trail), TREBLE_SPREAD)
    return aboard * on_board + (1 - aboard) * beside


def record(dry):
    """The input stage rounds off the highest peaks; then a low-pass limits the band."""
    rounded = CEILING * np.tanh(dry / CEILING)
    low_pass = signal.firwin(511, EDGE_HZ, window=("kaiser", 9), fs=SR)
    return signal.oaconvolve(rounded, low_pass[None], "same")


dry = scene()
out = record(dry)
log_audio(out)
```